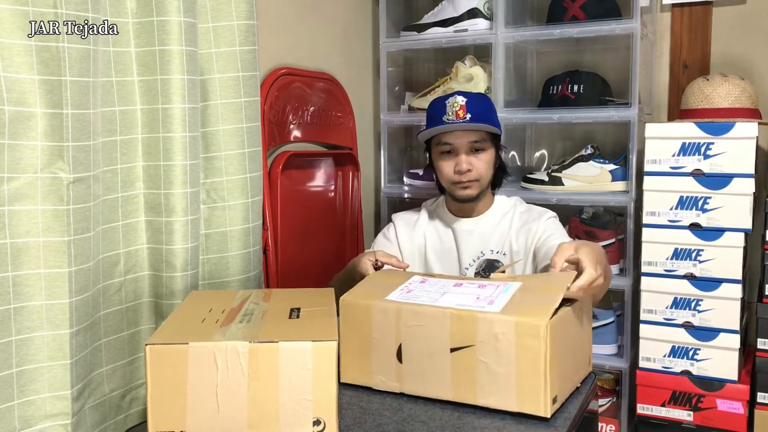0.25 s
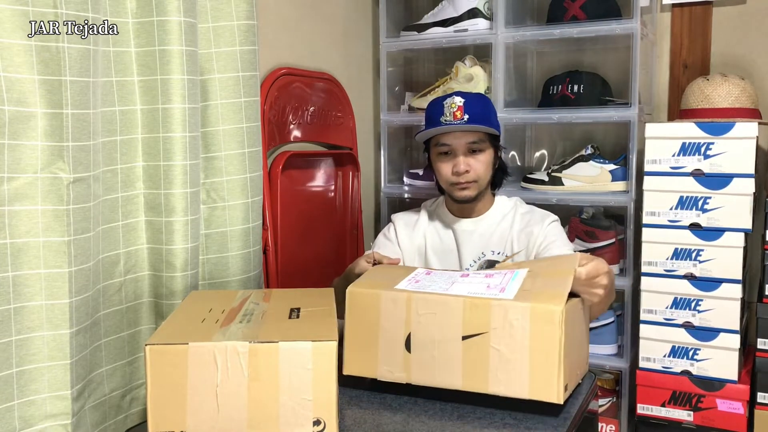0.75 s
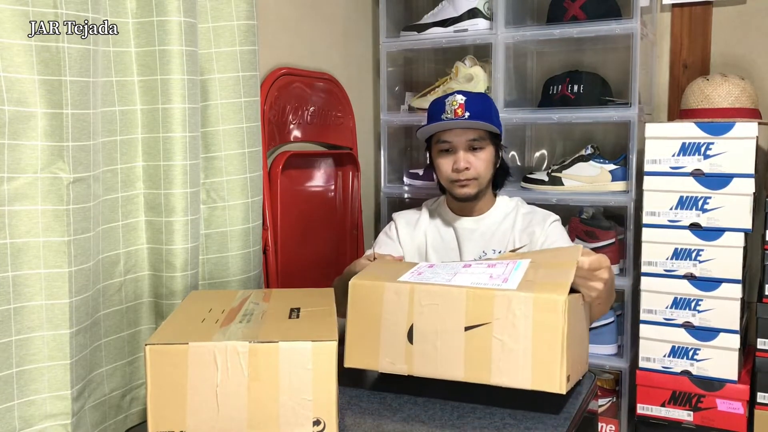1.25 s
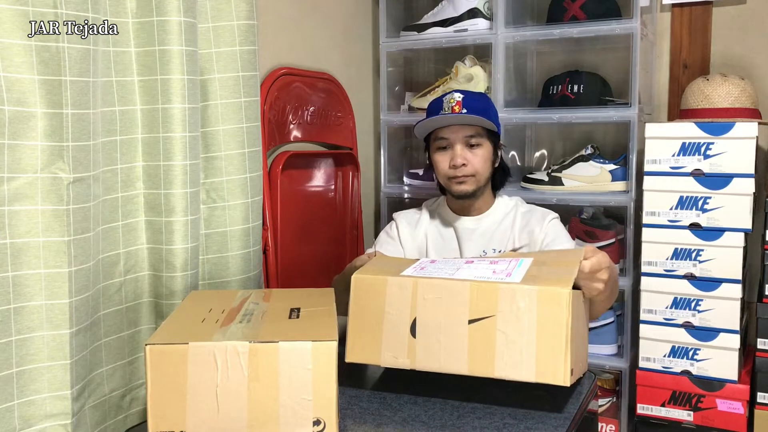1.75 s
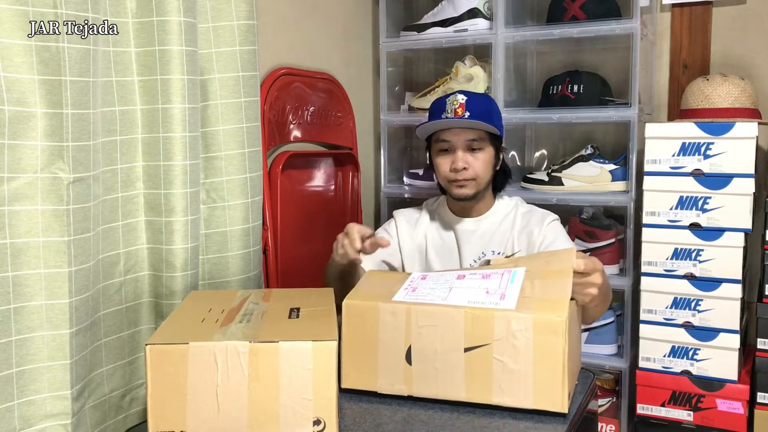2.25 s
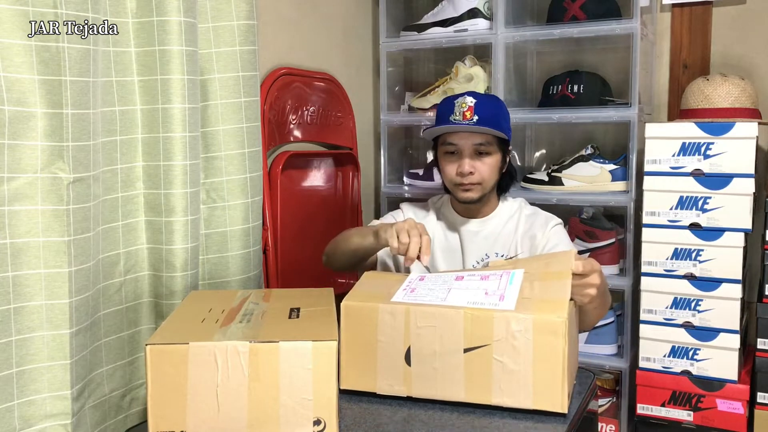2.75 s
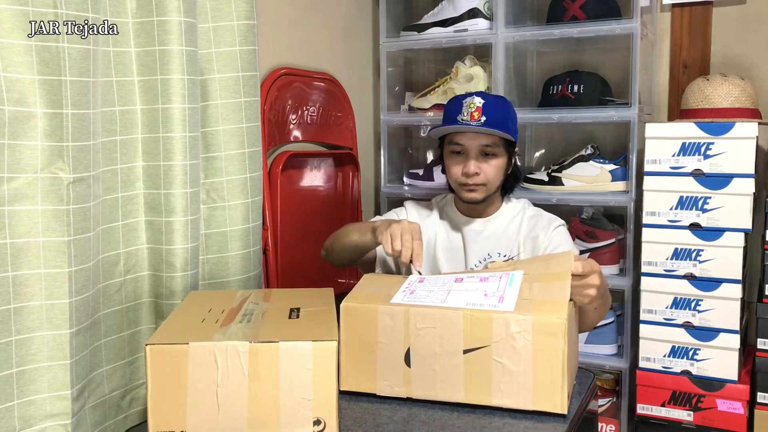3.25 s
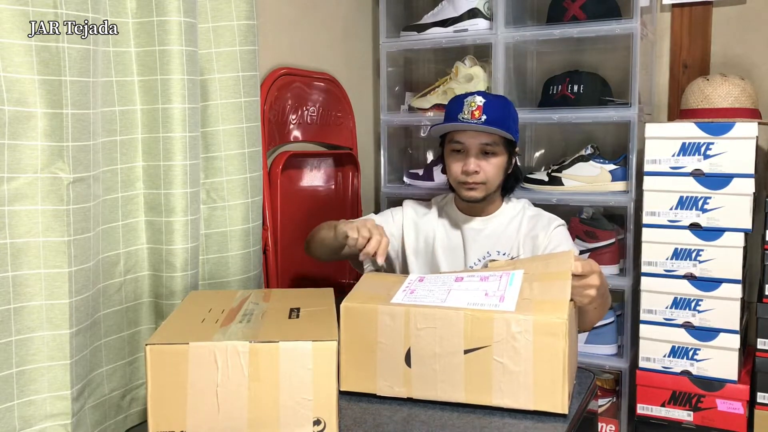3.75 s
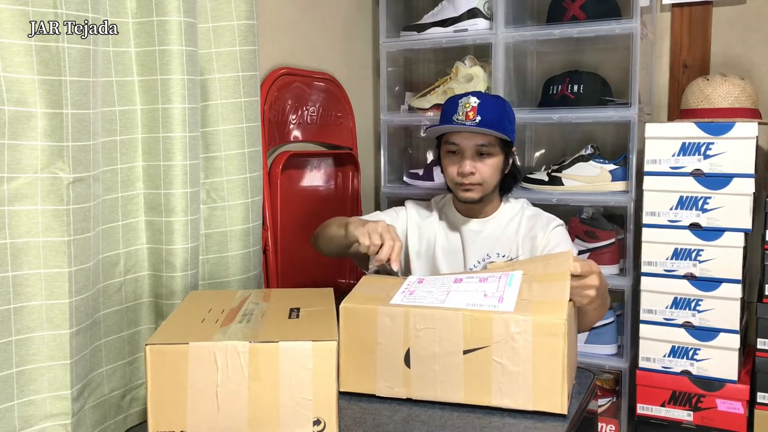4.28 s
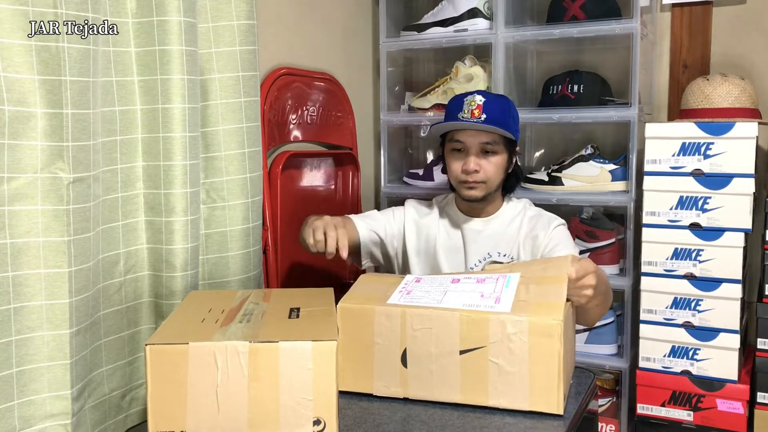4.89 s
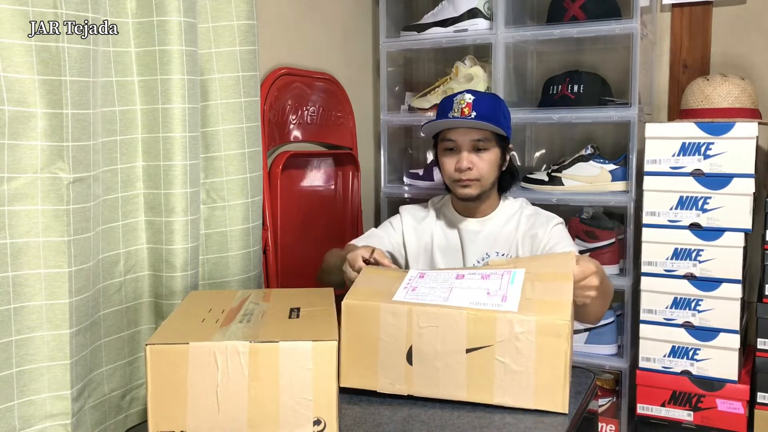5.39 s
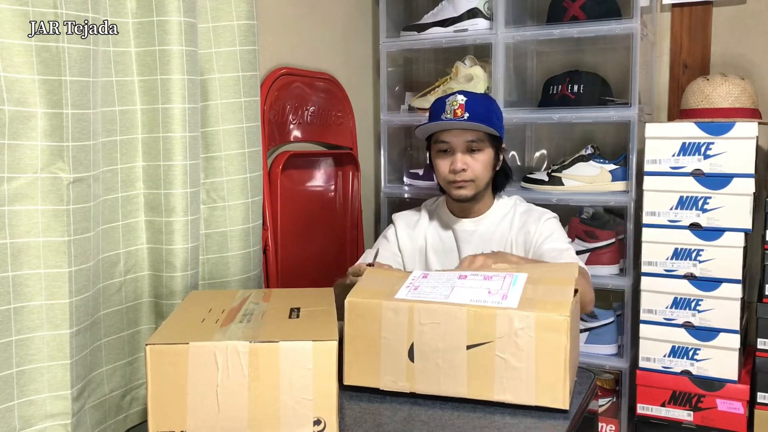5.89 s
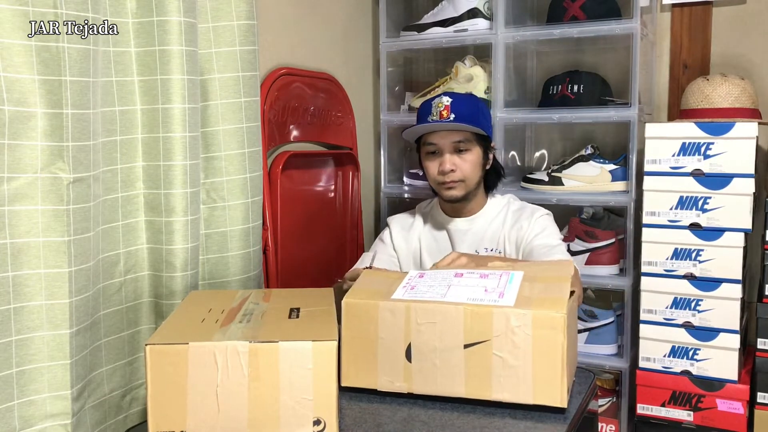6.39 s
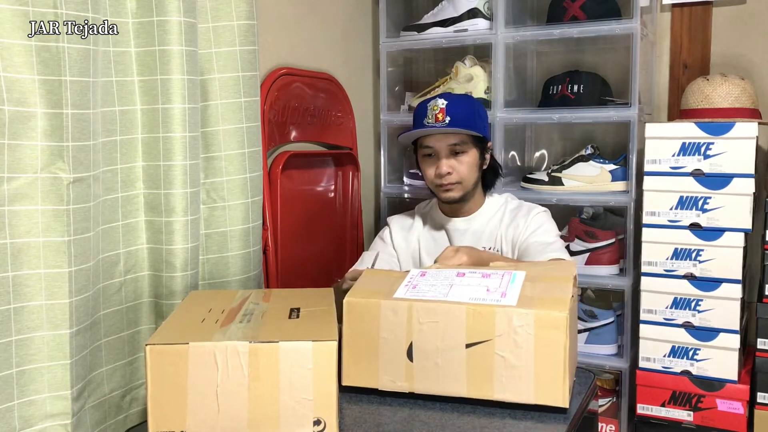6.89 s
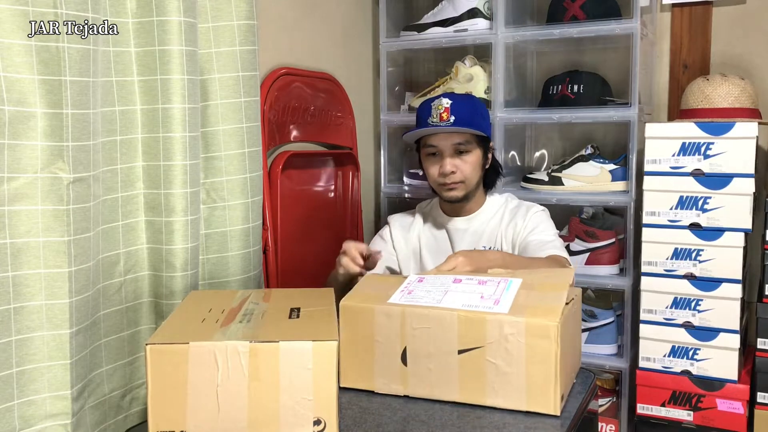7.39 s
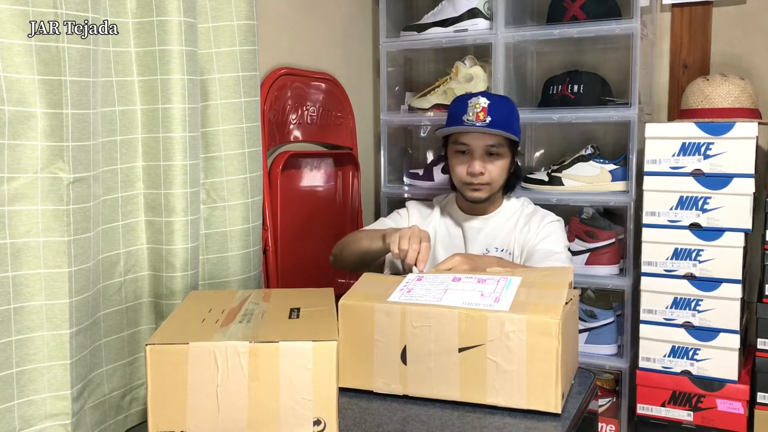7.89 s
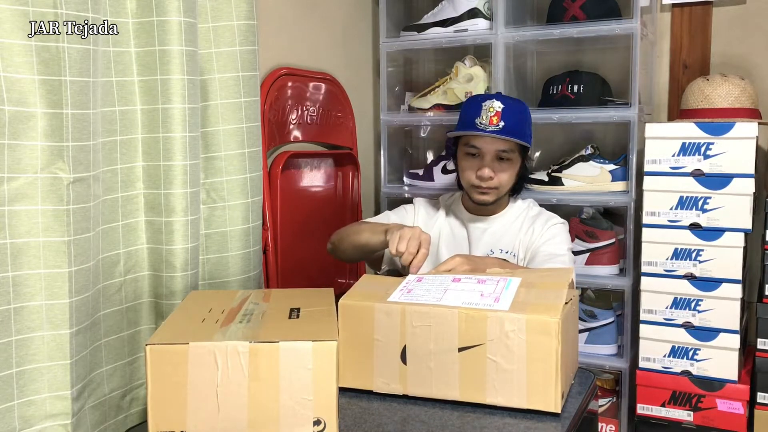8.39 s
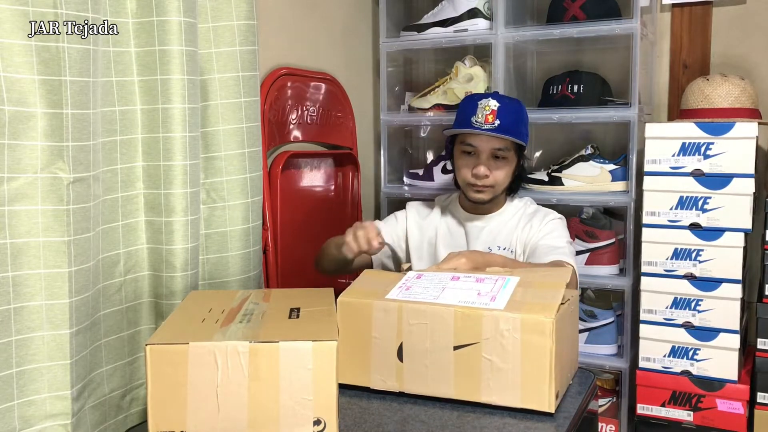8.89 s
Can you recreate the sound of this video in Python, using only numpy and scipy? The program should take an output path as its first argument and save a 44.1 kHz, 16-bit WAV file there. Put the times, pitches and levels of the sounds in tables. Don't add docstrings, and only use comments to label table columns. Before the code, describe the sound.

A cardboard box is lifted, straightened and dropped onto a table with one dominating hollow bang. Skin brushes the board, flaps squeak briefly, and a blade clinks faintly. Two bursts of scratchy tape cutting, full of small knocks and sharp glue crackles, are separated by quieter turning and rustling. Recorded close and dry indoors, over low hum and soft hiss.

```python
import sys
import numpy as np
from scipy import signal
from scipy.io import wavfile
from scipy.ndimage import uniform_filter1d

SR = 44100
rng = np.random.default_rng(int(sys.argv[2]) if len(sys.argv) > 2 else 0)


def attenuation_scalar(level_db):
    decades = np.asarray(level_db, float) / 20
    return 10 ** decades


def log_audio(samples):
    frames = np.atleast_2d(samples).T
    limited = np.clip(frames, -1, 1)
    pcm = np.round(limited * 32767).astype(np.int16)
    wavfile.write(sys.argv[1], SR, pcm)


N = 403074

# time of most pressure [s],
# build-up [s], let-go [s], wall level [dB], brightness [dB].
LIFT_STROKES = [(0.05, 0.64, .5, -54, -6.5), (0.23, 0.082, 0.17, -45, -8.5), (0.47, 0.11, 0.1, -48.5, -10),
                (0.69, 0.084, 0.12, -49, -16), (0.953, 0.34, 0.12, -56, -13),
                (1.078, 0.08, 0.24, -55, -15.5), (1.357, 0.076, 0.17, -44.5, -10.5),
                (1.651, 0.025, 0.2, -42, -16.5), (1.725, 0.073, 0.074, -39, -6.5),
                (1.951, 0.14, 0.046, -50.5, -12.5), (2.12, 0.12, 0.13, -51, -7),
                (2.26, .1, 0.17, -56, -4.5), (2.86, 0.092, 0.25, -60, -20.5), (1.52, 0.12, 0.1, -52, -25),
                (0.37, 0.066, 0.06, -46.5, -9)]
# [s, s, s, dB, dB].
TURN_STROKES = [(4.894, 0.049, 0.25, -52, -11.5), (5.03, 0.045, .08, -64, -3),
                (5.118, 0.049, 0.09, -53, -9), (5.243, 0.072, 0.35, -55.5, -15.5),
                (5.4, 0.062, 0.18, -50, -15), (5.557, 0.097, 0.26, -45, -6.5),
                (5.818, 0.13, 0.16, -41.5, -2), (6.08, 0.18, 0.24, -58, -2), (6.38, 0.22, 0.65, -56, -7.5),
                (7.78, 0.05, 0.17, -55, -36), (6.75, 1, 0.083, -61.5, -4), (6.85, 0.12, 0.11, -66.5, 9.5),
                (7.094, 0.14, 0.19, -66, 7), (7.254, 0.049, 0.1, -47.5, -5), (7.36, 0.12, 0.073, -46, -12),
                (7.625, 0.1, 0.12, -52, -18)]
# [s, s, s, dB, dB].
CUT_STROKES = [(3.15, 0.049, .1, -69, -15), (3.2, .02, .15, -44, -7), (3.27, 0.11, 0.096, -45.5, 0),
               (3.35, 0.18, 0.075, -39.5, -16), (3.477, 0.12, 0.057, -46, -12),
               (3.6, 0.096, 0.31, -62, -22), (3.72, 0.16, 0.055, -41.5, -11), (4.067, 0.022, .07, -76, -33),
               (4.135, .015, .1, -55, -5), (4.18, 0.02, 0.15, -43.5, -11), (4.27, 0.098, 0.094, -45, -9),
               (4.485, 0.02, 0.67, -48.5, -15), (4.62, 0.17, 0.18, -53.5, -3),
               (4.747, 0.065, 0.041, -43.5, -3), (7.91, .04, 0.13, -52, -20),
               (8.14, 0.035, 0.24, -52.5, -8), (8.27, 0.061, 0.18, -45, -12),
               (8.366, 0.056, 0.042, -41, -13.5), (8.49, 0.052, 0.07, -45, -15),
               (8.565, 0.022, 0.1, -45.5, -11.5), (8.63, 0.08, 0.045, -44, -5.5),
               (8.74, 0.073, 0.11, -51, -14.5), (8.87, 0.063, 0.43, -63, -4.5),
               (9.1, 0.063, .3, -53.5, -13)]
# [s, s, s, dB, dB].
JERK_STROKES = [(.165, 0.033, 0.037, -45, -11), (1.4, .04, .05, -48, -10), (1.575, .02, 0.027, -50, -17),
                (1.69, .04, .04, -41, -17), (2.09, .015, 0.046, -52, -10), (2.145, .03, .03, -50.5, -5.5),
                (2.165, .015, 0.018, -49, -17), (3.4, .02, 0.02, -41.5, -14), (3.44, 0.018, .03, -45, -10),
                (3.55, 0.014, 0.026, -44.5, -9), (3.635, .01, 0.032, -49, -8), (3.66, .01, .03, -56, -8),
                (3.69, .02, .04, -44, -19), (3.75, 0.016, 0.022, -44.5, -16),
                (4.785, .02, 0.036, -42.5, -31), (5.62, 0.035, 0.093, -51, -16), (5.75, .03, .04, -50, -8),
                (5.9, .05, 0.044, -57, -7), (5.975, .015, 0.072, -50, -5), (6.11, .015, 0.067, -59, -9),
                (6.4, 0.072, 0.05, -59, -5), (6.63, .04, 0.11, -54.5, -8), (8.24, 0.009, .04, -54, -9),
                (8.52, .015, .03, -40, -12), (8.605, 0.013, .04, -53, -7)]
# wall level [dB], scratch level [dB], hiss level [dB].
RESTING_HAND = (-68, -93, -88)
# time [s], pitch [Hz], scratch level [dB].
CONTACT_PATHS = [
    [(0.0, 906, 0), (0.63, 800, 0), (0.72, 1090, -3.5), (0.87, 658, 0.5), (1.38, 790, 0), (2.06, 700, 1),
     (2.16, 1140, 0.5), (2.21, 837, 3.5), (2.45, 776, 0)],
    [(3.15, 901, -2), (3.208, 900, -5.5), (3.37, 800, -2), (3.408, 663, 2.5), (3.558, 936, 0.5),
     (3.6, 785, 0.5), (3.694, 1200, 2.5), (3.782, 905, 1.5), (3.8, 898, 0)],
    [(4.1, 709, 5), (4.132, 950, -1.5), (4.288, 1110, -3.5), (4.414, 858, 6.5), (4.524, 1110, 0.5),
     (4.584, 752, 0.5), (4.78, 967, 0.5), (5.378, 638, 2.5), (5.45, 917, 3)],
    [(5.46, 744, -0.5), (5.66, 1140, 0), (6.18, 965, 2.5), (6.21, 598, 1), (6.79, 1060, 0.5),
     (6.95, 639, 0.5), (7.41, 1210, 2), (7.52, 754, 0.5), (7.8, 1040, 6)],
    [(7.85, 1280, -2), (7.924, 1420, 1), (8.028, 676, 3), (8.226, 950, -0.5), (8.794, 1130, 2),
     (8.826, 743, 2.5), (8.996, 970, -0.5), (9.06, 804, 0), (9.14, 1240, 5)],
]
# time [s], pitch [Hz].
GRIP_PATH = [(0, 6840), (1.7, 6500), (3.2, 5800), (3.33, 9000), (3.45, 6000), (4.2, 7450), (5.4, 6230),
             (5.8, 8950), (6.0, 5560), (6.75, 10800), (7.18, 9900), (7.25, 6300), (8.45, 6900),
             (8.62, 9700), (8.75, 8500), (8.86, 11500), (9.0, 12500)]
# frequency [Hz], level [dB per Hz].
WALL_SPECTRUM = [(90, -23), (150, 0), (190, -14.5), (265, 1.5), (350, -6), (440, -2), (700, -2),
                 (1100, -5.5), (1500, -5), (2200, -12), (3200, -43.5)]
# frequency [Hz], level [dB per Hz].
SCRATCH_SPECTRUM = [(1200, -22), (2100, 0.5), (3000, -0.5), (4000, -1.5), (5300, -3.5), (7500, -29)]
# frequency [Hz], level [dB per Hz].
HISS_SPECTRUM = [(4000, -30), (5700, 0), (8000, -1), (10500, 0), (13000, -5.5), (14500, -8.5), (15800, -12)]
# frequency [Hz], level [dB per Hz].
THUMP_SPECTRUM = [(45, -45.5), (80, 8), (135, 5), (190, -15), (260, 3), (350, -30.5)]
# start [s], wall level [dB], wall pitch [Hz], thump over wall [dB].
DULL_KNOCKS = [(0.452, -25, 293, -24), (0.673, -33.5, 935, -33), (1.439, -29.5, 260, -40),
               (1.633, -41, 751, -16), (1.905, -39.5, 776, -13), (2.031, -31, 700, -24),
               (2.232, -34, 850, -15), (2.3555, -35, 800, -17), (2.929, -43.5, 364, -10),
               (3.347, -29.5, 660, -8), (3.4, -29, 607, -34), (4.259, -29, 900, -8),
               (4.752, -27, 1200, -14), (4.754, -32, 2200, -30), (4.9, -41, 522, -12),
               (5.107, -39, 900, -8), (5.13, -43, 498, -14), (5.219, -40, 800, -20), (5.244, -37, 800, -10),
               (5.316, -35, 520, -9.5), (5.364, -36, 520, -12), (6.231, -36.5, 403, -9),
               (6.451, -34, 285, -31), (5.48, -41, 500, -20), (7.879, -34, 2010, -37),
               (7.887, -31.5, 1500, -33.5), (7.9, -35.5, 1300, -25), (8.36, -31.5, 320, -14.5),
               (4.26, -31, 1200, -30), (4.764, -28, 900, -12), (8.344, -34, 1090, -7),
               (8.549, -31.5, 1100, -18), (9.0957, -28, 260, -28)]
# start [s], wall level [dB], wall pitch [Hz],
# snap over wall [dB].
TAPE_SNAGS = [(0.084, -43.5, 2190, -3), (0.453, -50, 2350, 6), (0.671, -44.5, 2190, -15),
              (1.305, -52, 780, -12), (1.941, -45, 650, -9), (2.082, -44, 616, -8),
              (4.715, -43.5, 1080, -5.5), (5.024, -47.5, 750, -3), (5.077, -46, 610, -6),
              (8.122, -55, 760, -3), (8.208, -46, 570, -16), (8.236, -44, 1070, -7),
              (0.236, -26, 755, -8.5), (1.335, -29, 1040, -10.5), (3.1765, -25, 1090, -1.5),
              (3.627, -33, 1460, -9), (3.676, -44, 1600, -8), (3.743, -38, 958, -12),
              (4.052, -44, 400, -11), (4.165, -34.5, 306, -7.5), (4.25, -33.5, 800, -1.5),
              (4.473, -47, 1070, -1), (6.1, -39.5, 1500, -7), (6.798, -44, 2200, 0.5),
              (7.21, -35, 1410, -11), (7.764, -48, 1500, -18), (7.62, -42, 1400, -18),
              (7.885, -42, 2800, -14), (8.485, -33, 920, -6.5), (9.1148, -29.5, 277, -4.5)]
# start [s], wall level [dB], wall pitch [Hz],
# snap over wall [dB].
FIRM_JABS = [(3.475, -33, 681, -15), (3.543, -32.5, 1090, -8.5), (3.591, -41, 600, -2),
             (3.654, -44, 581, 2), (3.721, -35, 975, -16), (4.319, -47.5, 253.6, 8.5),
             (4.532, -38, 1050, -2), (4.567, -35.5, 720, -6), (4.602, -27, 696, -7),
             (5.832, -31, 1330, -12), (5.963, -47, 514, 7.5), (7.243, -32.5, 2300, -7.5),
             (8.278, -32, 1100, -10.5), (8.47, -55.5, 487, 16), (8.516, -37.5, 270, -5.5),
             (8.73, -32, 760, -7)]
# wall level [dB], thump level [dB], scratch level [dB], snap level [dB].
SET_DOWN = (-5, -33, -27.5, -26)
# frequency [Hz], level [dB], T60 [s].
BOX_MODES = [(149, -8.5, 0.068), (275, -7, 0.066), (285, -6, 0.03), (329.5, 1.5, 0.029), (410, 0, 0.035),
             (506, 1.5, 0.05), (620, 1, 0.04), (680, -8, 0.043), (850, 2, 0.02), (1050, 1, 0.018),
             (1460, -17, 0.07), (2300, -8, 0.015)]
# time of middle [s], level [dB], pitch [Hz].
PALM_PUSHES = [
    (4.7568, -20.5, 400),
    (4.2625, -26, 300),
    (4.262, -34, 100),
    (4.764, -31, 105),
    (4.61, -36, 110),
    (8.2, -44, 155),
    (5.77, -39, 155),
    (4.6045, -29, 600),
    (9.099, -32, 250),
]
# start [s], length [s], pitch [Hz], level [dB].
FLAP_SQUEAKS = [(.208, 0.082, 1560, -43), (0.22, 0.035, 2740, -49), (5.738, 0.033, 1080, -47),
                (8.548, 0.12, 1020, -50), (8.548, 0.13, 1500, -54), (4.763, 0.025, 1450, -41),
                (4.76, 0.04, 960, -45), (8.25, .11, 3150, -55), (3.29, 0.068, 4100, -57),
                (7.885, .04, 1480, -44), (7.882, 0.04, 2220, -48.5), (4.26, 0.023, 1506, -44),
                (8.732, 0.038, 1560, -44.5), (2.33, .07, 12750, -71), (4.262, .03, 800, -42),
                (.208, .06, 890, -48)]
# start [s], peak level [dB], # pitch
# [Hz].
TAPE_CRACKLES = [(0.0842, -33, 8900), (0.856, -1.5, 5770), (0.982, -33, 9700), (1.1174, -52, 6000),
                 (1.64, -35, 7700), (2.5461, -41, 5800), (2.805, -46, 12060), (3.16, -23.5, 10000),
                 (3.1776, -6, 7400), (3.1812, -19, 5500), (3.1602, -30, 5500), (4.1685, -16.5, 7160),
                 (4.25, -25, 5180), (4.604, -19, 10000), (5.014, -34, 11200), (5.1058, -34, 3500),
                 (6.766, -25, 12500), (6.572, -29, 11650), (6.7533, -19.5, 10100), (6.789, -25, 9700),
                 (6.8015, -24.5, 7520), (6.9064, -26, 8500), (7.0857, -22.5, 10200), (7.1327, -31, 10900),
                 (7.153, -32, 9880), (7.4565, -36, 13300), (8.2365, -30, 6060), (8.3597, -20.5, 4900),
                 (8.4686, -20, 9660), (8.7147, -25.5, 4740), (9.0966, -13.5, 10900), (9.0968, -22.5, 4950),
                 (9.1158, -12.5, 10400), (4.6025, -23, 3500), (3.4353, -31, 3500), (3.4655, -31, 3000),
                 (3.7196, -27, 3600), (4.7141, -30, 4000)]
# start [s], peak level [dB], pitch
# [Hz].
SMALL_CRACKLES = [(4.0605, -42, 3600), (4.2854, -29, 4460), (6.7216, -41, 12100), (6.8985, -36, 12500),
                  (6.915, -41, 12000), (6.86, -42, 10200), (6.971, -45, 9000), (7.103, -42, 10000),
                  (6.988, -45, 9890), (7.0154, -46, 11900), (7.0389, -42, 10300), (7.0524, -42, 11260),
                  (7.1114, -40, 11500), (8.8864, -46, 11800), (8.8994, -51, 8120), (8.9794, -45, 11700)]
# start [s], peak level [dB].
BLADE_CLINKS = [
    (2.343, -48),
    (2.355, -44),
    (2.372, -46),
    (2.3864, -45),
    (2.414, -35),
]
# frequency [Hz], level [dB], T60 [s].
BLADE_MODES = [(4400, -4, .022), (5200, -2, .012), (6100, -2, .025), (9850, 0, .025), (10200, -3, .04),
               (12800, -12, .012), (14700, -8, .012)]
# time of most sway [s], level [dB].
TABLE_NUDGES = [(0.01, -42.5), (0.43, -36), (0.939, -33), (1.55, -45), (1.8, -47.5), (1.97, -50),
                (2.16, -47.5), (2.67, -68), (3.2, -50), (3.45, -56), (3.69, -43), (4.25, -47.5),
                (4.55, -50), (4.8, -43.5), (4.99, -49), (5.35, -47.5), (5.65, -48), (5.88, -52),
                (6.16, -48.5), (6.4, -44.5), (6.53, -51), (7.15, -50.5), (7.34, -42.5), (7.52, -58),
                (7.72, -50), (8.3, -55), (8.47, -50), (8.8, -54)]
# frequency [Hz], level [dB per Hz].
AIR_SPECTRUM = [(20, -3), (60, -8.5), (110, -19), (150, -17), (250, -15.5), (400, -21), (800, -30),
                (1500, -35), (2500, -42), (5000, -49.5), (10000, -48.5), (15800, -57)]
# frequency [Hz], T60 [s].
ROOM_DECAY = [(100, 0.3), (500, 0.15), (2000, 0.18), (8000, 0.14)]

LAG_S = 0.0014


def rubbing():
    t = np.arange(N) / SR
    wall_rest_db, scratch_rest_db, hiss_rest_db = RESTING_HAND
    wall_press = pressure(wall_rest_db, lift_db=0, bright_share=0)
    scratch_press = pressure(scratch_rest_db, lift_db=0.5, bright_share=0.56)
    hiss_press = pressure(hiss_rest_db, lift_db=0, bright_share=1)
    clumps = drift(24)
    fine = grit(2500, 3.8, 1.86)

    when, sing_hz, scratch_db = np.concatenate(CONTACT_PATHS).T
    slips = mottle(grit(900, 2.2, 1.31), 2.0)
    singing = resonate(slips, np.interp(t, when, sing_hz), 414)
    wall = attenuation_scalar(-3.5) * colour(slips, WALL_SPECTRUM) + attenuation_scalar(-5.5) * singing

    scrapes = mottle(grit(2500, 1.96, 1.0), 1.95)
    scratch = colour(scrapes, SCRATCH_SPECTRUM) * attenuation_scalar(np.interp(t, when, scratch_db))

    grip = resonate(fine, np.interp(t, *np.transpose(GRIP_PATH)), 2140)
    hiss = mottle(attenuation_scalar(1.5) * colour(fine, HISS_SPECTRUM) + attenuation_scalar(-3.5) * grip, 2.4)

    out = wall_press * attenuation_scalar(-4.0 + 0.89 * clumps) * wall
    out += scratch_press * attenuation_scalar(-4.5 + 1.3 * clumps) * scratch
    return out + hiss_press * attenuation_scalar(-3.5 + 1.3 * clumps) * hiss


def pressure(rest_db, lift_db, bright_share):
    power = attenuation_scalar(rest_db) ** 2
    for s, rise_s, fall_s, db, bright_db in LIFT_STROKES + TURN_STROKES + CUT_STROKES + JERK_STROKES:
        power = power + swell(s, rise_s, fall_s, db + lift_db + bright_share * bright_db)
    return level(power)


def knocks():
    # start, wall dB, wall Hz, thump dB, scratch dB, snap dB
    blows = [(s, db, hz, db + thump, db - 24, db - 37) for s, db, hz, thump in DULL_KNOCKS]
    for rows, thump in ((TAPE_SNAGS, -27), (FIRM_JABS, -16)):
        for s, db, hz, snap in rows:
            blows.append((s, db, hz, db + thump, db - 3 + 0.92 * snap, db + snap))

    out, drives, t = np.zeros(N), np.zeros((4, N)), np.arange(6000) / SR
    for s, wall_db, hz, thump_db, scratch_db, snap_db in blows:
        noise = rng.standard_normal(len(t))
        rattle = noise * (attenuation_scalar(-60 * t / 0.12) + 1.96 * attenuation_scalar(-60 * t / 0.019))
        width_hz = 0.7 * hz + 100
        patch = evened(resonate(resonate(noise, hz, width_hz), hz, width_hz))
        patch *= np.minimum(t / 0.0035, 1) * attenuation_scalar(-60 * t / 0.071)
        edge = np.exp(-t / 0.0014) * np.cos(2 * np.pi * hz * t) * (t > 0)
        edge = uniform_filter1d(edge, size=5)
        add(out, s + LAG_S, attenuation_scalar(wall_db - 9) * patch - attenuation_scalar(wall_db - 2.0) * edge)
        drive_db = (wall_db - 19.5, thump_db - 4.0, scratch_db - 8.5, snap_db - 14)
        for drive, db in zip(drives, drive_db):
            add(drive, s + LAG_S, attenuation_scalar(db) * rattle)
    spectra = (WALL_SPECTRUM, THUMP_SPECTRUM, SCRATCH_SPECTRUM, HISS_SPECTRUM)
    return out + sum(colour(drive, points) for drive, points in zip(drives, spectra))


def drop():
    wall_db, thump_db, scratch_db, snap_db = SET_DOWN
    out, t = np.zeros(N), np.arange(12000) / SR
    slaps = attenuation_scalar(2 * evened(uniform_filter1d(rng.standard_normal(len(t)), size=60)))
    rattle = rng.standard_normal(len(t)) * slaps * attenuation_scalar(-60 * t / 0.14)
    rise = np.minimum(t / 0.001, 1)
    layers = ((thump_db - 20.5, THUMP_SPECTRUM), (wall_db - 15.0, WALL_SPECTRUM),
              (scratch_db - 0.5, SCRATCH_SPECTRUM), (snap_db - 3.0, HISS_SPECTRUM))
    landing = sum(attenuation_scalar(db) * colour(rattle * rise, points) for db, points in layers)
    late = t - 0.0008
    crack = 0.4 * np.exp(-abs(late) / 0.00015) * np.cos(2 * np.pi * 10800 * late)
    boom = ring(BOX_MODES, t) * np.minimum(0.5 + t / 0.006, 1) * rise
    boom = uniform_filter1d(boom, size=9)
    add(out, 0.8564, landing - attenuation_scalar(wall_db - 2.5) * boom - crack)
    return out


def pushes():
    out, t = np.zeros(N), np.arange(-1500, 1500) / SR
    for s, db, hz in PALM_PUSHES:
        bell = np.exp(-(t * hz / 0.6) ** 2)
        add(out, s + t[0], attenuation_scalar(db) * bell * np.sin(2 * np.pi * hz * t))
    return out


def squeaks():
    out = np.zeros(N)
    for s, length_s, hz, db in FLAP_SQUEAKS:
        noise = rng.standard_normal(6000)
        width_hz = 150 + 0.06 * hz
        tone = evened(resonate(resonate(noise, hz, width_hz), hz, width_hz))
        progress = np.minimum(np.arange(len(noise)) / SR / length_s, 1)
        add(out, s, attenuation_scalar(db) * tone * np.sin(np.pi * progress ** 0.45))
    return out


def crackles():
    out, t = np.zeros(N), np.arange(400) / SR
    u = t / 0.00013
    ticks = [(s, db + 6.0, hz) for s, db, hz in SMALL_CRACKLES]
    for s, db, hz in TAPE_CRACKLES + ticks:
        cycles = u * np.exp(-u) * np.sin(2 * np.pi * hz * t + 0.36)
        add(out, s + LAG_S / 2 - 0.0001, -attenuation_scalar(db + 1.0) * cycles)
    return out


def blade():
    out, t = np.zeros(N), np.arange(6000) / SR
    for s, db in BLADE_CLINKS:
        noise = rng.standard_normal(len(t))
        chatter = abs(noise) * attenuation_scalar(-60 * t / 0.0003) + 0.15 * noise * attenuation_scalar(-60 * t / 0.01)
        add(out, s, attenuation_scalar(db - 14) * signal.oaconvolve(chatter, ring(BLADE_MODES, t)))
    return out


def table():
    rise_s, fall_s = 0.078, 0.36
    sway = level(sum(swell(s, rise_s, fall_s, db) for s, db in TABLE_NUDGES))
    wobble_db = drift(4)
    rock_hz = 34.8 + 1.84 * drift(3.5)
    return np.sqrt(2) * sway * attenuation_scalar(wobble_db) * np.sin(2 * np.pi * np.cumsum(rock_hz) / SR)


def motor():
    turn = 2 * np.pi * np.cumsum(27.1 + 0.3 * drift(3.27)) / SR
    hum = np.zeros(N)
    for order, db in enumerate([-79, -57, -63, -65.5], start=1):
        hum += np.sqrt(2) * attenuation_scalar(db + 3.5 * drift(4.9)) * np.sin(order * turn)
    air = colour(rng.standard_normal(N), AIR_SPECTRUM)
    above = signal.sosfilt(signal.butter(4, 130, "high", fs=SR, output="sos"), air)
    return hum + attenuation_scalar(-59 + 1.3 * drift(0.63)) * air / above.std()


def room(x):
    taps = np.zeros(SR // 2)
    at = np.arange(150, len(taps) - 20, 20)
    taps[at + rng.integers(0, 20, len(at))] = rng.choice([-1., 1.], len(at))
    hz, t, z = signal.stft(taps, SR, nperseg=256)
    decay = attenuation_scalar(-60 * t / read(ROOM_DECAY, hz)[:, None])
    tail = signal.istft(z * decay, SR, nperseg=256)[1]
    return signal.oaconvolve(x, tail / np.linalg.norm(tail))[:N]


def swell(s, rise_s, fall_s, db):
    t = np.arange(0, N + 200, 100) / SR - s
    away = np.where(t < 0, -t / max(rise_s, 0.01), t / max(fall_s, 0.01))
    return attenuation_scalar(db - 15 * away ** 1.6) ** 2


def level(power):
    return np.interp(np.arange(N) / 100, np.arange(len(power)), np.sqrt(power))


def grit(per_s, spread_db, smooth):
    sizes = attenuation_scalar(spread_db * np.minimum(rng.exponential(1, N), 5))
    slips = sizes * (rng.random(N) < per_s / SR)
    return evened(evened(slips * rng.standard_normal(N)) + smooth * rng.standard_normal(N))


def mottle(x, patchy_db):
    hz, t, z = signal.stft(x, nperseg=512)
    patches = uniform_filter1d(rng.standard_normal(z.shape), size=4, axis=0)
    patches = uniform_filter1d(patches, size=11, axis=1)
    return signal.istft(z * attenuation_scalar(patchy_db * evened(patches)), nperseg=512)[1][:N]


def drift(per_s):
    noise = uniform_filter1d(rng.standard_normal(N), size=200)
    return evened(signal.lfilter([1], [1, -np.exp(-2 * np.pi * per_s / SR)], noise))


def resonate(x, hz, width_hz):
    turn = np.exp(2j * np.pi * np.cumsum(hz * np.ones(len(x))) / SR)
    r = np.exp(-np.pi * width_hz / SR)
    smooth = signal.lfilter([np.sqrt((1 - r * r) / 2)], [1, -r], x / turn)
    return 2 * (turn * smooth).real


def ring(modes, t):
    hz, db, t60 = np.transpose(modes)[:, :, None]
    return (attenuation_scalar(db - 60 * t / t60) * np.sin(2 * np.pi * hz * t)).sum(0)


def colour(x, points):
    hz = abs(np.fft.fftfreq(8192, 1 / SR))
    gain = np.log(attenuation_scalar(np.maximum(read(points, hz), -90)))
    taps = np.fft.ifft(np.exp(gain - 1j * signal.hilbert(gain).imag)).real[:4096]
    return signal.oaconvolve(x, taps / np.linalg.norm(taps))[:len(x)]


def read(points, hz):
    f, value = np.transpose(points)
    return np.interp(np.log(hz + 1), np.log(f + 1), value)


def evened(x):
    return x / np.sqrt(np.mean(x ** 2) + 1e-20)


def add(mix, s, sound):
    part = mix[round(s * SR):][:len(sound)]
    part += sound[:len(part)]


def scene():
    slow = rubbing() + knocks() + squeaks() + drop() + pushes()
    sharp = crackles() + blade()
    echo = room(attenuation_scalar(-11.0) * slow + attenuation_scalar(-3.0) * sharp)
    return (slow + sharp + echo + table() + motor())[None]


def band_limit(x):
    return signal.sosfilt(signal.butter(12, 16830, fs=SR, output="sos"), x)


def record(dry):
    held = np.clip(dry, -0.93, 0.93)
    limited = signal.oaconvolve(held, signal.firwin(255, 15850, fs=SR)[None], "same")
    return band_limit(limited)


dry = scene()
out = record(dry)
log_audio(out)
```